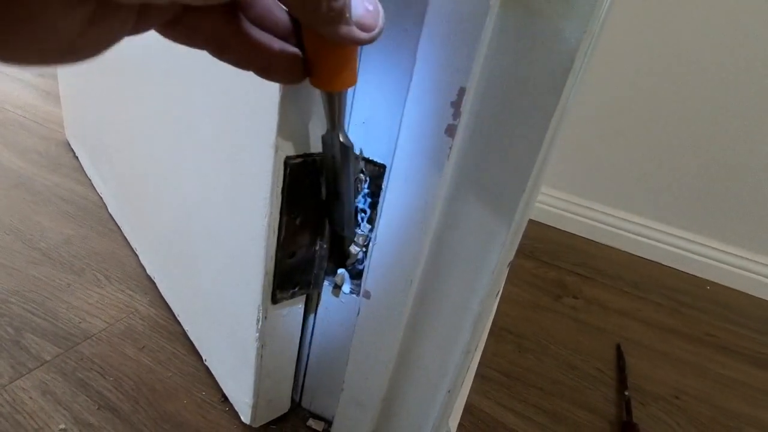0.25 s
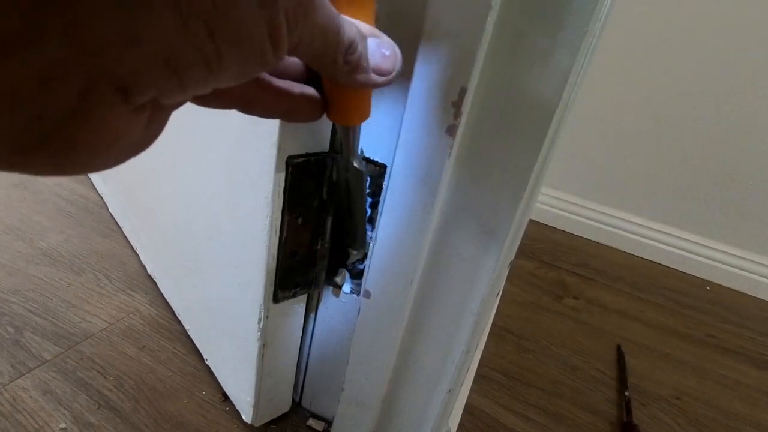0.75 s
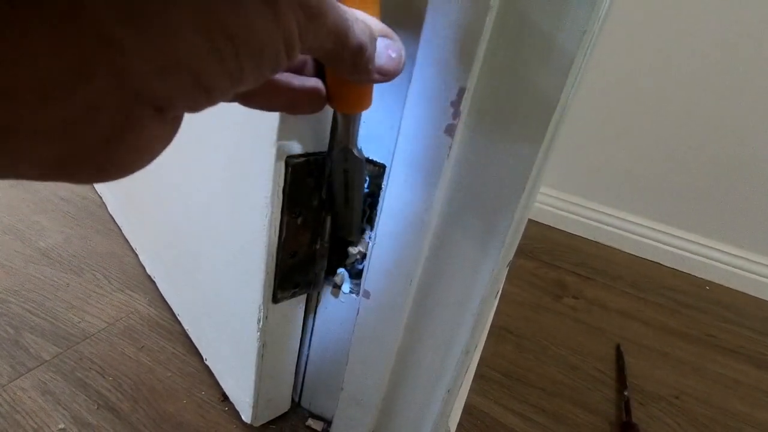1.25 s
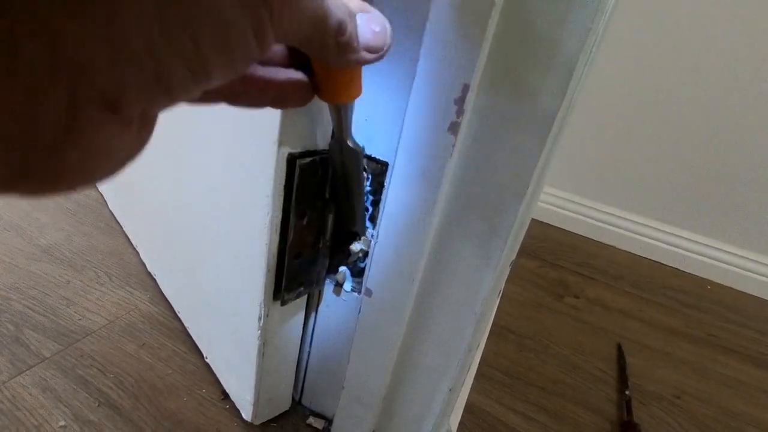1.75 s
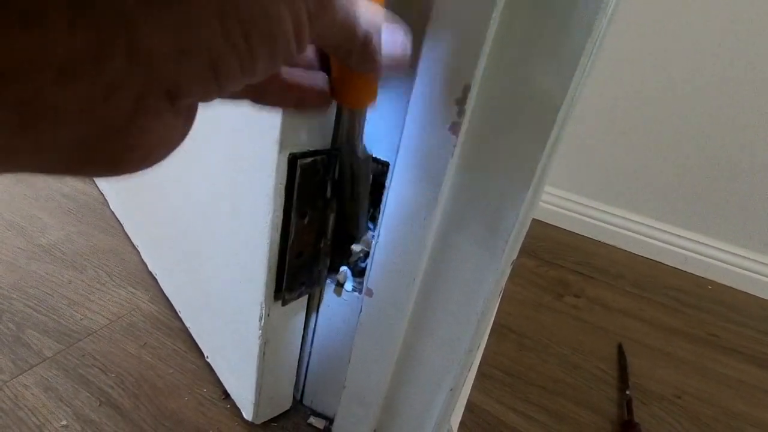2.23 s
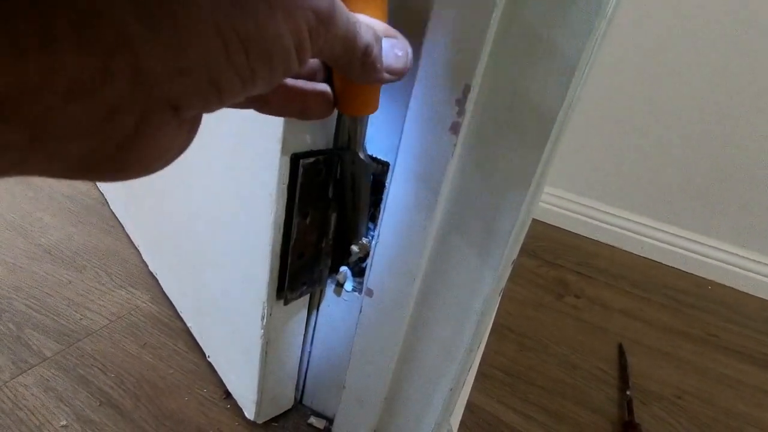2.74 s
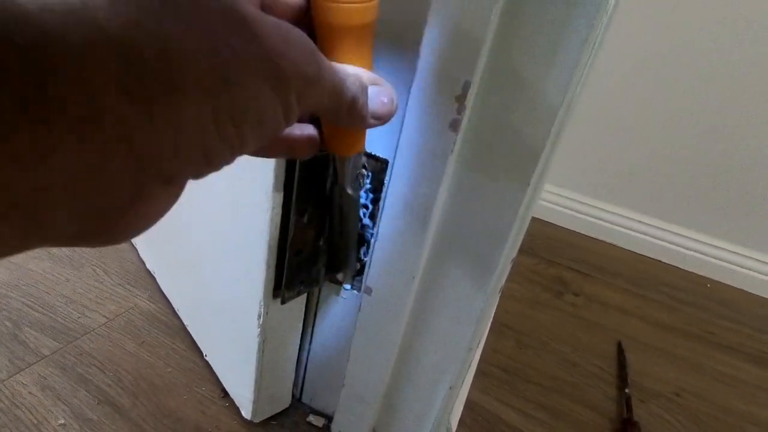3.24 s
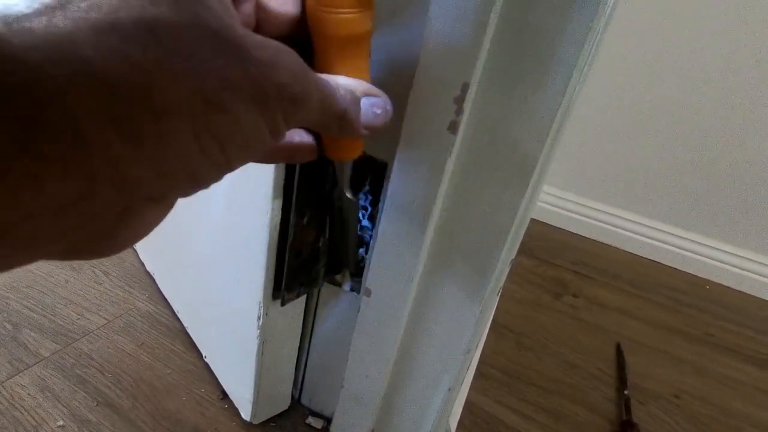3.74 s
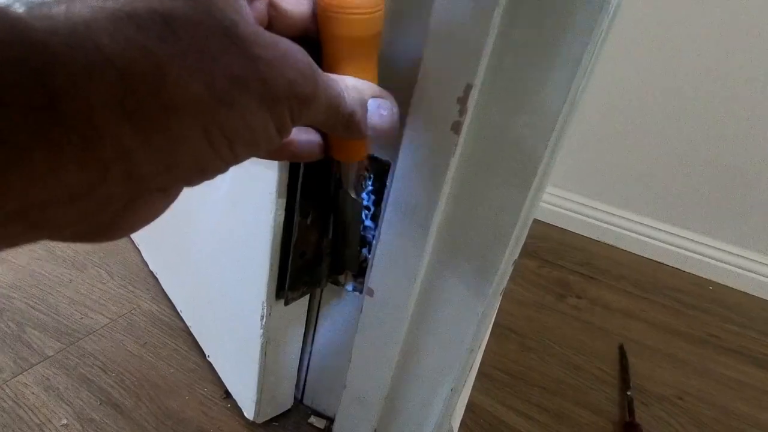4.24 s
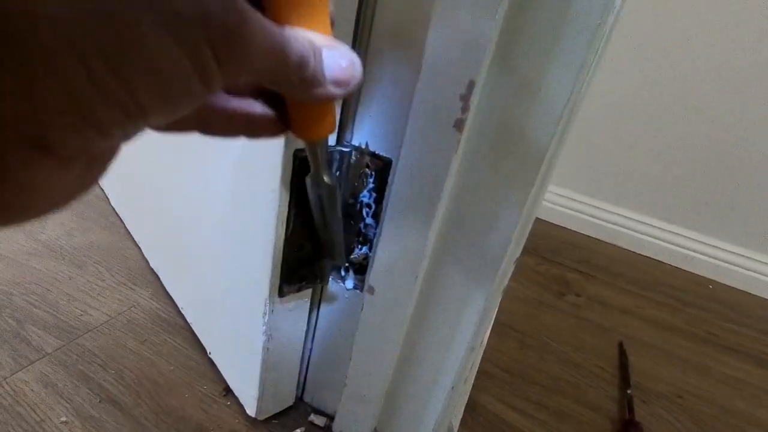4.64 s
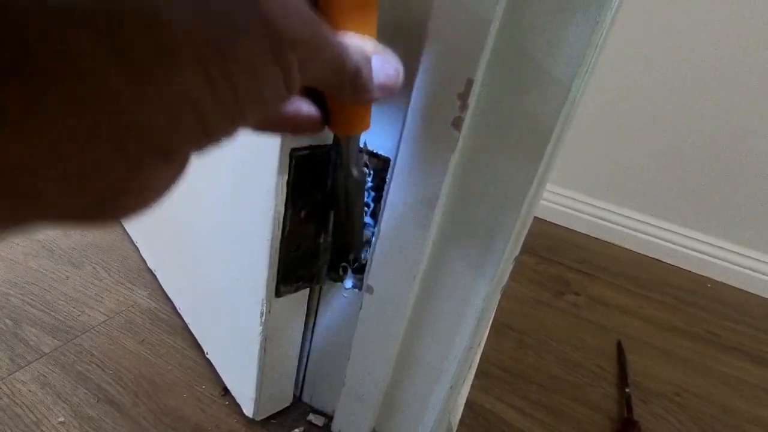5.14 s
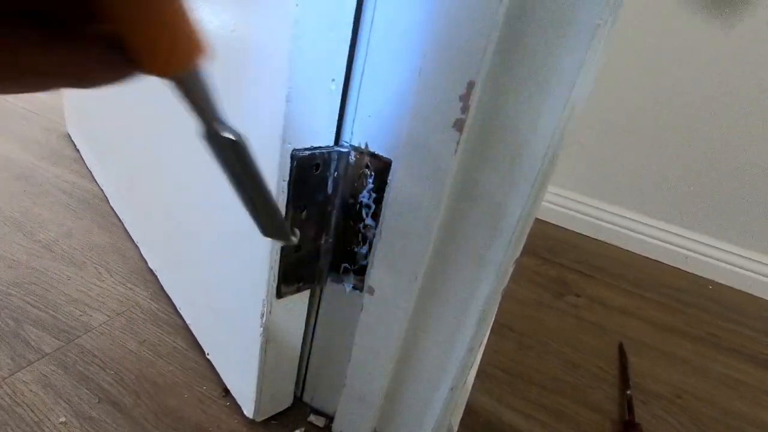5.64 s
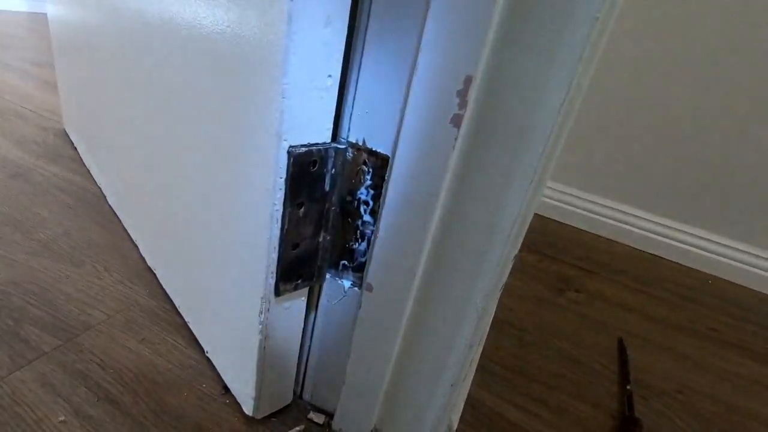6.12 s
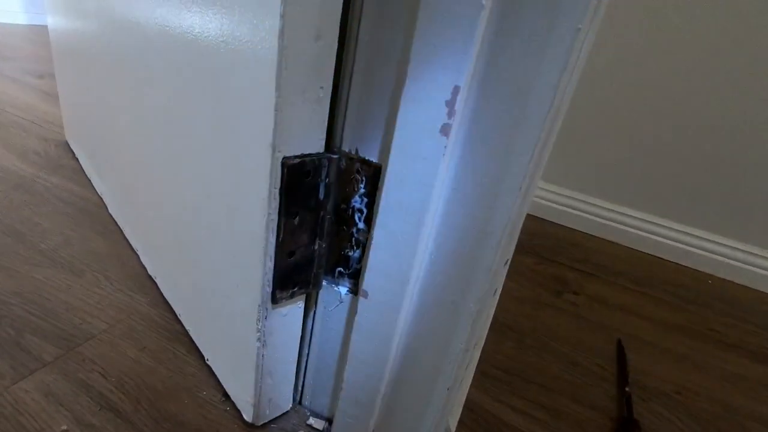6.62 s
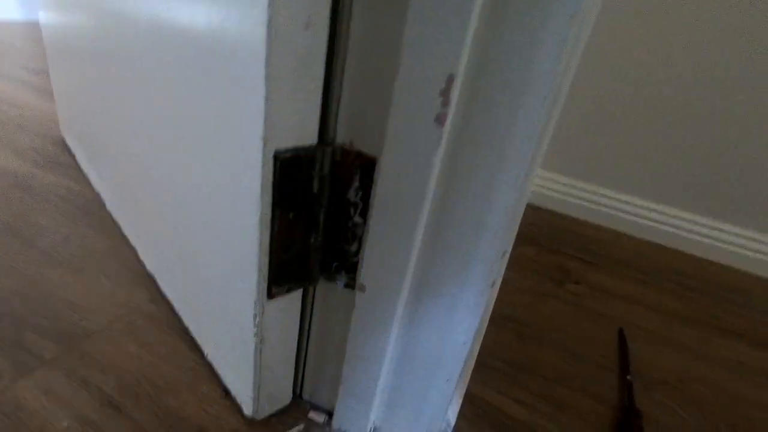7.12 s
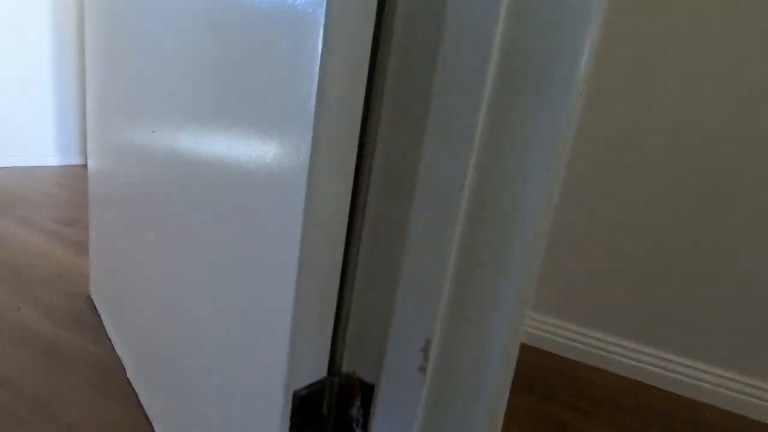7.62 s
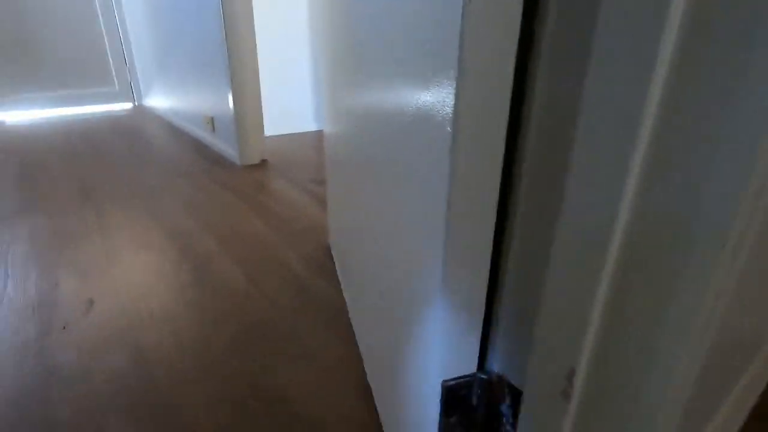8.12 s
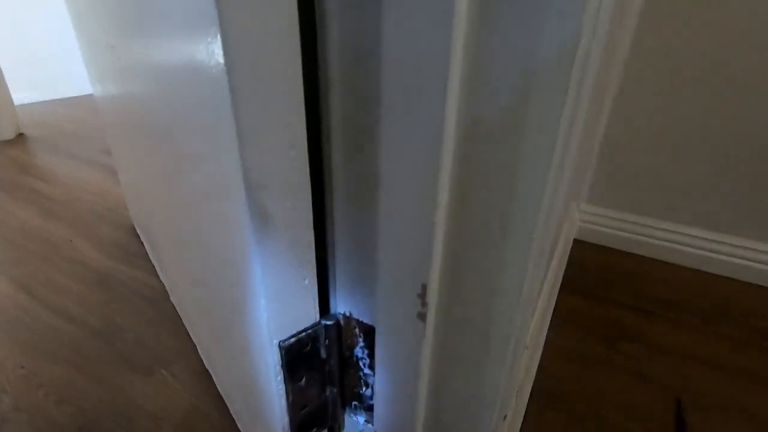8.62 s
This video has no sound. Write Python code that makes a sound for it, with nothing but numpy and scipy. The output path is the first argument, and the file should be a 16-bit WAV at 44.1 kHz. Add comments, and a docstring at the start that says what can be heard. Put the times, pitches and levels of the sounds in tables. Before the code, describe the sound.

A bare room with a diffuse tail of about a second and quiet, bass-heavy air noise; the microphone is very close to the work. A chip snap is fading at the start, with another small snap and a faint scratch before 0.4 s. Sharp hammer-on-chisel blows crack at 0.66, 1.4, 2.2, 2.47 and a much harder one at 2.72, with a light, singing tap at 0.99. More follow at 3.3, 3.7 and 3.96, the loudest at 4.2, overloading slightly. Splintering snaps and short scrapes surround them, busiest from 3.6 to 5.2, where the last blow lands. From 6.06 to 6.55 the hammer bounces woodenly on the floor, farther off. Deep handling thumps and finger rustles begin near 6.9, strongest at 7.05. The chisel clatters with bright steel around 7.5-7.9 while feet shuffle softly; a tiny tick comes at 8.3, and a last brush near 8.9.

```python
"""First heard: the ring of an earlier blow dying away over still air, then a hammer knocking a chisel beside a
door hinge. Place: a bare room, the camera's microphone very near the blade; the loud first cycles of blows
clip. Ten blows, some with a rebound, crack fibres and ring steel and frame; chips snap and the blade scratches.
Then the hammer clatters onto the floor farther off, the chisel follows, a hand takes up the camera and feet
shift. Contacts are dying modes, noise bursts and pulses; the room adds a diffuse tail."""
import sys
import numpy as np
from scipy import signal
from scipy.fft import rfft, irfft
from scipy.io import wavfile
from scipy.ndimage import uniform_filter1d

SR = 44100
rng = np.random.default_rng(int(sys.argv[2]) if len(sys.argv) > 2 else 0)


def inscribe(sig):
    """Save sig as 16-bit PCM at rate SR to the path in sys.argv[1].

    A 1-D sig is mono; a 2-D sig holds one channel per row.
    Samples are clipped to [-1, 1] before scaling.
    """
    pcm = np.round(np.clip(np.atleast_2d(sig).T, -1, 1) * 32767)
    wavfile.write(sys.argv[1], SR, pcm.astype(np.int16))


N = 391150
AGE = np.arange(2 ** 14) / SR  # time since a contact, s


def amp(db):
    """Converts dB to an amplitude factor."""
    return 10 ** (np.asarray(db) / 20)


def unit(x):
    """Scales to rms 1."""
    return x / np.sqrt(np.mean(x ** 2) + 1e-20)


def blow_sized(x):
    """Scales to the energy of three milliseconds at rms 1."""
    return x * np.sqrt(.003 * SR / np.sum(x ** 2))


def read(points, hz):
    """Reads a table of values against frequency, on a log-frequency axis."""
    f, value = np.transpose(points)
    return np.interp(np.log(hz + 1), np.log(f), value)


def add(mix, s, sound):
    """Mixes a sound in at time s, cutting whatever falls outside the mix."""
    start = round(s * SR)
    sound = sound[max(-start, 0):]
    part = mix[max(start, 0):][:len(sound)]
    part += sound[:len(part)]


def noise(spectrum, size):
    """Noise of rms 1 with the given spectrum."""
    white = rfft(rng.standard_normal(size))
    gain = amp(read(spectrum, np.fft.rfftfreq(size, 1 / SR)))
    return unit(irfft(white * gain, size))


def burst(spectrum, t60, rise=.0001):
    """A dying burst of noise: many tiny fractures or dense modes."""
    envelope = (1 - np.exp(-AGE / rise)) * 1000 ** (-AGE / t60)
    return blow_sized(noise(spectrum, len(AGE)) * envelope)


def ring(modes, detune=0.013):
    """Dying modes whose dB give their energy; each contact shifts them a little."""
    out = 0
    for k, (hz, db, t60) in enumerate(modes):
        turns = hz * (1 + detune * rng.standard_normal()) * AGE
        mode = blow_sized(np.sin(2 * np.pi * turns) * 1000 ** (-AGE / t60))
        out = out + (-1) ** k * amp(db) * mode
    return blow_sized(out)


def click(spectrum):
    """One smooth short pulse with the given spectrum."""
    gain = amp(read(spectrum, np.fft.rfftfreq(2 ** 9, 1 / SR)))
    pulse = np.fft.fftshift(irfft(gain)) * np.hanning(2 ** 9)
    return blow_sized(np.pad(pulse, (0, len(AGE) - len(pulse))))


def swell(s, rise, fall):
    """A rounded envelope that grows towards about time s and dies away after it."""
    t = np.arange(N) / SR - s
    return 2 * np.exp(-np.minimum(np.logaddexp(-t / rise, t / fall), 20))


# the bare room's decay: f/Hz, t60/s
ROOM_DECAY = [(80, 0.98), (300, 0.89), (700, 1), (1600, 0.95), (4000, 0.99), (8000, 0.67), (14000, 0.45)]


def room(x, wet_db):
    """A diffuse tail that builds up after the first walls and fades at its own rate in each band."""
    hz, t, z = signal.stft(rng.standard_normal(SR), SR, nperseg=256)
    decay = 1000 ** (-t / read(ROOM_DECAY, hz)[:, None])
    tail = signal.istft(z * decay, SR, nperseg=256)[1][:SR]
    age = np.arange(SR) / SR
    tail *= 1 - np.exp(-age / 0.0075)
    tail *= 1 + 1.12 * np.exp(-age / 0.037)  # near walls give the strongest echoes
    return amp(wet_db) * signal.fftconvolve(x, tail / np.linalg.norm(tail))


# still air and deep rumble at the microphone: f/Hz, relative level/dB per Hz
AIR_SPECTRUM = [(8, 55), (20, 39), (40, 28), (70, 0.5), (110, 14.5), (220, 7.5), (400, -0.5), (900, -3.5),
                (1600, -4.5), (2300, -9), (5000, -13), (10000, -20), (16000, -29.5)]


def background():
    """Steady noise, heaviest in the deep bass, and a faint low hum."""
    t = np.arange(N) / SR
    hum = amp(-53) * np.sin(2 * np.pi * 81 * t)
    return amp(-27.5) * noise(AIR_SPECTRUM, N) + hum


# chips snapping and the blade set against the wood, very near:
# t/s, relative level/dB, ring f/Hz, steel relative level/dB, door knock relative level/dB
CHIP_SNAPS = [(0.0543, -13.5, 2020, -9.5, -5), (0.2703, -27, 2160, -19, -7), (0.327, -29, 1420, -27, -11.5),
              (1.5636, -18.5, 3340, -20, -2), (2.9761, -15, 1980, -13, -1), (3.57, -17, 1560, -25, -8),
              (3.7262, -7.5, 1400, -30.5, -33.5), (3.9924, -1, 1600, -33, -45.5),
              (4.3634, -7.5, 2040, -15, -7), (4.5206, -2, 2000, -15.5, -20.5), (4.667, -26.5, 1960, -14, 2),
              (4.7444, -30, 2060, -13, 3.5), (4.9665, -21.5, 1320, -10, -4.5),
              (5.0856, -23.5, 1180, -34, -2), (5.178, -8, 3310, -13, -13), (5.1815, -11, 2080, -4, -4),
              (5.5354, -33, 2035, -4, -38.5)]
# door frame under the blade, modes: nominal f/Hz, relative level/dB, t60/s
FRAME_MODES = [(836, 0, 0.027), (1119, 4, 0.016), (1251, -7.5, 0.085), (1670, 4, 0.032), (1900, 3, 0.018)]
# struck chisel, modes: nominal f/Hz, relative level/dB, t60/s
STEEL_MODES = [(2600, -10.5, 0.012), (3197, 3, 0.018), (3940, -6.5, 0.0094), (4140, 3, 0.022),
               (5410, 2.5, 0.026), (6035, -6, 0.015), (7690, -5, 0.0074), (8040, -3, 0.023),
               (9010, 1, 0.021), (10900, -32, .015)]
# door leaf, modes: nominal f/Hz, relative level/dB, t60/s
DOOR_MODES = [(170, -2.5, 0.013), (261, -4, 0.089), (350.8, -0.5, 0.14), (410, -3, 0.047),
              (644.4, -4.5, 0.062)]
# cracking fibres: f/Hz, relative level/dB per Hz
CRACK_SPECTRUM = [(200, -1), (700, -7), (1500, 9), (2500, 0), (5000, -3), (9000, -11.5), (11000, -17.5),
                  (16000, -37.5)]
# frame, jamb and wall radiating into the room: f/Hz, relative level/dB per Hz
JAMB_SPECTRUM = [(150, -1), (450, -11), (650, -10.5), (850, 0.5), (1150, -3.5), (1600, 1), (2400, -11.5),
                 (3500, -11), (5300, -13), (7000, -14), (9000, -14), (10500, -25), (16000, -45)]


def chips():
    """Small snaps ring frame, steel and door lightly; the ring of an earlier blow is already dying away at the
    start."""
    out = np.zeros(N)
    for s, db, hz, steel_db, door_db in CHIP_SNAPS:
        wood = amp(-22.5) * ring(FRAME_MODES, detune=.03) + amp(7.0) * ring([(hz, 0, .012)])
        steel = amp(steel_db + 15) * ring(STEEL_MODES, detune=0.028)
        crack = amp(steel_db + 19.0) * burst(CRACK_SPECTRUM, t60=0.016)
        knock = amp(door_db + 11.5) * ring(DOOR_MODES, detune=.04)
        near = wood + steel + crack + knock
        radiated = amp(-1.5) * near + amp(-7) * click(JAMB_SPECTRUM)
        add(out, s + 0.0013, amp(db - 17) * near)
        add(out, s + .0008, amp(db - 13.0) * room(radiated, wet_db=-12.5))
    earlier = click(CRACK_SPECTRUM) + amp(-2.5) * ring([(3438, 0, 0.016)]) + amp(1.0) * ring(DOOR_MODES)
    add(out, -.07, amp(-14.5) * room(earlier, wet_db=-3.5))  # begins before t = 0
    return out


# blade strokes along the wood, very near: start t/s, end t/s, rms level/dB of the direct sound
SCRATCH_STROKES = [(0.243, 0.277, -46.5), (1.839, 1.867, -46), (3.55, 3.586, -39), (4.662, 4.756, -36),
                   (5.078, 5.129, -38.5)]


def scratches():
    """The edge sticks and slips: irregular clicks ring frame, blade and door."""
    out = np.zeros(N)
    for start, end, db in SCRATCH_STROKES:
        size = max(round((end - start) * SR), 2 ** 8)
        slips = rng.standard_normal(size) * (rng.random(size) < 1800 / SR)  # about 1800 per second
        body = ring(FRAME_MODES) + amp(-16.5) * ring(STEEL_MODES)
        body += amp(-3.5) * burst(CRACK_SPECTRUM, t60=0.0015) + amp(-2) * ring(DOOR_MODES)
        pressure = np.sqrt(np.hanning(size))  # the edge bites and lets go gradually
        stroke = signal.fftconvolve(slips * pressure, body)
        stroke *= amp(db) / (np.std(stroke[:size]) + 1e-9)
        add(out, start, stroke)
        add(out, start, room(stroke, wet_db=-14.0))
    return out


# hammer blows on the chisel and rebounds, very near:
# t/s, relative level/dB, frame ring f/Hz, relative level/dB of that ring
HAMMER_BLOWS = [(0.662, -8, 1760, -4.5), (0.666, -16, 1610, 1.5), (1.409, -12, 1890, -1),
                (1.424, -6.5, 1560, -2), (2.198, -6.5, 1630, -6), (2.466, -0.5, 1920, 0.5),
                (2.716, 7.5, 1370, -1.5), (3.325, -4.5, 1270, 9), (3.684, -6.5, 1740, 8.5),
                (3.957, -1.5, 1680, 4), (4.211, 10, 1660, -3), (5.17, -5, 1630, -1.5)]
# the wall's low thud: f/Hz, relative level/dB per Hz
THUD_SPECTRUM = [(20, 6), (55, 6), (110, 0.5), (200, -3), (330, -23.5), (700, -27.5), (2000, -70)]
# the harder the blow, the more the wood outweighs the steel
STEEL_DB, STEEL_LOSS_DB_PER_DB = -13.5, 0.94
# the thud grows more slowly than the blow
THUD_DB, THUD_LOSS_DB_PER_DB = -1.5, 0.18


def blows():
    """Each blow cracks fibres, rings steel and frame, and shakes the wall a moment later."""
    out = np.zeros(N)
    for s, db, hz, ring_db in HAMMER_BLOWS:
        steel_db = STEEL_DB - STEEL_LOSS_DB_PER_DB * db
        thud_db = THUD_DB - THUD_LOSS_DB_PER_DB * db
        wood = amp(-6.5) * ring(FRAME_MODES, detune=0.077) + amp(ring_db - 10.0) * ring([(hz, 0, .022)])
        steel = amp(steel_db + 8) * ring(STEEL_MODES, detune=0.018)
        crack = amp(steel_db + 13.0) * burst(CRACK_SPECTRUM, t60=0.037, rise=0.00014)
        thud = amp(thud_db) * burst(THUD_SPECTRUM, t60=0.28, rise=0.0062)
        # scattered splits, about 300 per second, weakening after the blow
        splits = rng.standard_normal(len(AGE)) * (rng.random(len(AGE)) < 300 / SR)
        splits *= 1000 ** (-AGE / 0.25)
        splinters = signal.fftconvolve(splits, click(CRACK_SPECTRUM))[:len(AGE)]
        near = wood + steel + crack + thud + amp(-18.5) * blow_sized(splinters)
        radiated = click(JAMB_SPECTRUM) + amp(-9) * near
        radiated += amp(ring_db - 9.5) * ring([(hz, 0, .005)])
        add(out, s + 0.00027, amp(db - 3.0) * near)
        add(out, s + .0003, amp(db - 3.5) * room(radiated, wet_db=-11.5))
    return out


# chisel and hammer head after a light tap, modes: nominal f/Hz, relative level/dB, t60/s
TAP_MODES = [(2230, -2, 0.022), (3396, 1.5, 0.017), (4520, -9, 0.011), (5200, -12.5, 0.3),
             (7740, -16, .008), (9020, -3, 0.0066)]
# a dull knock on wood: f/Hz, relative level/dB per Hz
KNOCK_SPECTRUM = [(60, 6.5), (200, 0.5), (450, 5.5), (700, -1), (1200, -6.5), (2000, -29), (4000, -33),
                  (12000, -61)]


def light_tap():
    """A trial tap on the chisel knocks the door and leaves the hammer head singing."""
    out = np.zeros(N)
    s = .9897
    steel = amp(-17.0) * ring(TAP_MODES, detune=0.0018) + amp(-24.0) * burst(CRACK_SPECTRUM, t60=0.0033)
    knock = amp(-28.5) * ring(DOOR_MODES, detune=0.071)
    knock += amp(-26.5) * burst(KNOCK_SPECTRUM, t60=0.063, rise=0.0019)
    bright = amp(-27.5) * ring([(5250, 0, 0.0067)])
    radiated = amp(-19.5) * steel + knock + amp(-33.5) * click(CRACK_SPECTRUM)
    add(out, s, steel + knock)
    add(out, s, room(bright, wet_db=-9.5))  # the head's bright ring lingers in the room
    add(out, s, room(radiated, wet_db=-3.0))
    return out


# tools landing on the floor, farther off:
# t/s, relative level/dB, boards relative level/dB, steel relative level/dB
LANDINGS = [(6.059, 2.5, -6, -32), (6.076, -1.5, -2, -14), (6.132, 7.5, -19, -26), (6.164, -8, -7, -34),
            (6.197, -7, -17, -32), (6.222, 1.5, -0.5, -21.5), (6.358, -3, -0.5, -23),
            (6.447, -10.5, 0.5, -22), (6.504, -20, 5.5, -21), (6.548, -29, 9, -11),
            (7.505, -13.5, -19.5, -11), (7.611, 1.5, -32, -30), (7.662, -21.5, -25, 4.5),
            (7.68, -7, -21, -10), (7.698, -4, -15.5, -19), (7.71, -13, -15, -8), (7.725, -5, -15.5, -25),
            (7.778, -7.5, -11, -31), (7.824, -8.5, -15.5, -27), (7.857, -16, -5, -36)]
# floor boards, modes: nominal f/Hz, relative level/dB, t60/s
BOARD_MODES = [(157.6, -4.5, 0.17), (215, -1.5, 0.093), (273.6, 1.5, 0.092), (332, -4.5, 0.18),
               (378.4, 1.5, 0.12), (492, -3.5, 0.036), (536, -0.5, 0.1), (630, -1, 0.05), (826, -7, 0.019)]
# loose chisel, modes: nominal f/Hz, relative level/dB, t60/s
LOOSE_STEEL_MODES = [(3380, 9, 0.057), (3530, -13, 0.045), (4450, 9, 0.03), (4320, -4, 0.16),
                     (5200, -12, .04), (5850, -8, 0.043), (6300, -0.5, 0.0133), (9400, -9.5, 0.056)]
# the handle's clack: f/Hz, relative level/dB per Hz
CLACK_SPECTRUM = [(100, -12), (400, 9), (900, 3), (1900, 5), (2800, -9), (4500, -13.5), (8000, -37),
                  (16000, -124)]
# a small bright tick: f/Hz, relative level/dB per Hz
TICK_SPECTRUM = [(800, 6), (3000, 2), (6500, 0), (9000, -13.5), (16000, -58)]
CHISEL_RINGS_FROM_S = 7.65


def drops():
    """Hammer and chisel bounce on the boards, far enough off for the room to answer strongly."""
    out = np.zeros(N)
    for s, db, boards_db, steel_db in LANDINGS:
        boards = amp(boards_db + 5.5) * ring(BOARD_MODES, detune=0.017)
        boards += amp(boards_db + 5.0) * burst(KNOCK_SPECTRUM, t60=0.064, rise=0.0015)
        clack = burst(CLACK_SPECTRUM, t60=0.014, rise=0.00028)
        clack += amp(-10.5) * burst(CLACK_SPECTRUM, t60=0.033)
        tick = amp(steel_db - 0.5) * burst(TICK_SPECTRUM, t60=0.018)
        steel = amp(steel_db + 0.5) * ring(LOOSE_STEEL_MODES, detune=.016)
        steel *= s > CHISEL_RINGS_FROM_S
        wood = boards + amp(-8) * clack + tick
        add(out, s + .0008, amp(db - 8.5) * (wood + steel))
        # the wide boards fill the room best
        add(out, s + .0008, amp(db - 7.5) * room(wood + amp(-1.5) * steel, wet_db=-5.5))
    return out


# the hand bumps the camera, at the microphone itself: t/s, level/dB, thump f/Hz
CAMERA_BUMPS = [(6.874, -25.5, 87), (6.913, -14, 46), (7.052, -7.5, 48.3), (7.055, -22, 133),
                (7.294, -36.5, 110), (7.58, -29, 50.05), (7.67, -26.5, 40), (7.79, -23, 44.75),
                (8.041, -27.5, 85), (8.112, -20.5, 62)]
# rumble that comes with a thump: f/Hz, relative level/dB per Hz
RUMBLE_SPECTRUM = [(10, -18), (30, 1), (50, 15.5), (90, -16), (200, -21), (500, -30.5), (2000, -60)]
# fingers brush the camera: t/s of the firm touch, level/dB, rise/s, fall/s
FINGER_BRUSHES = [(6.861, -51.5, 0.0035, 0.014), (6.985, -48.5, 0.033, 0.015), (7.07, -54, 0.023, 0.038),
                  (7.38, -61, 0.024, 0.032), (8.86, -46.5, 0.031, 0.047)]
# rustle of the fingers: f/Hz, relative level/dB per Hz
RUSTLE_SPECTRUM = [(200, 5.5), (1500, 7), (4000, -1), (9000, -8), (11000, -21.5), (16000, -24)]
BUMP_RISE_CYCLES, BUMP_FALL_CYCLES = 0.31, 1  # a thump swells and dies within a few of its own cycles


def handling():
    """The hand thumps the camera body while lifting it, and the fingers brush over it."""
    t = np.arange(N) / SR
    rumble = noise(RUMBLE_SPECTRUM, N)
    rumble /= np.sqrt(uniform_filter1d(rumble ** 2, 2 ** 11))  # evens out its loudness
    out = np.zeros(N)
    for s, db, hz in CAMERA_BUMPS:
        thump = np.cos(2 * np.pi * hz * (t - s)) + amp(-11.5) * rumble
        out += amp(db) * swell(s, BUMP_RISE_CYCLES / hz, BUMP_FALL_CYCLES / hz) * thump
    touch = sum(amp(db) * swell(s, rise, fall) for s, db, rise, fall in FINGER_BRUSHES)
    return out + touch * noise(RUSTLE_SPECTRUM, N)


# soft shuffling steps on the boards: t/s, relative level/dB
FOOTSTEPS = [(7.271, -47.5), (7.479, -24.5), (8.093, -33.5), (8.188, -24.5), (8.639, -31.5)]
# a shoe's scuff: f/Hz, relative level/dB per Hz
SCUFF_SPECTRUM = [(100, 0), (250, 13), (500, 6), (800, -1.5), (1600, -7), (2500, -16), (5000, -26),
                  (12000, -54)]


def steps():
    """Feet shift softly on the boards as dull noise bursts; something small ticks once."""
    out = np.zeros(N)
    for s, db in FOOTSTEPS:
        tread = amp(db) * burst(SCUFF_SPECTRUM, t60=0.19, rise=0.00367)
        add(out, s, tread)
        add(out, s, room(tread, wet_db=-1))
    add(out, 8.312, amp(-41.5) * burst(TICK_SPECTRUM, t60=0.005))
    return out


def scene():
    """Sums all layers into one channel."""
    trimming = chips() + scratches() + blows() + light_tap()
    aftermath = drops() + handling() + steps()
    return (background() + trimming + aftermath)[None]


def record(dry, max_gain_db=9, ceiling_db=-4, recovery_db=17, attack=0.00087, start_db=-3):
    """Gain control ducks within milliseconds and creeps back (dB/s); the first cycles of a blow clip."""
    power = abs(uniform_filter1d(dry[0] ** 2, 2 ** 7, origin=2 ** 6 - 1))
    level_db = 10 * np.log10(power + 1e-12)
    level_db[0] = start_db
    fall = np.arange(N) * recovery_db / SR
    held_db = np.maximum.accumulate(level_db + fall) - fall  # peak hold with a steady release
    wanted_db = np.minimum(ceiling_db - held_db, max_gain_db)
    r = np.exp(-1 / (attack * SR))
    gain_db = signal.lfilter([1 - r], [1, -r], wanted_db)
    driven = dry * amp(gain_db)
    clipped = driven / (1 + (driven / .96) ** 6) ** (1 / 6)
    lowpass = signal.firwin(255, 15900, window=("kaiser", 9), fs=SR)  # cutoff in Hz
    return signal.oaconvolve(clipped, lowpass[None], "same")


dry = scene()
out = record(dry)
inscribe(out)
```